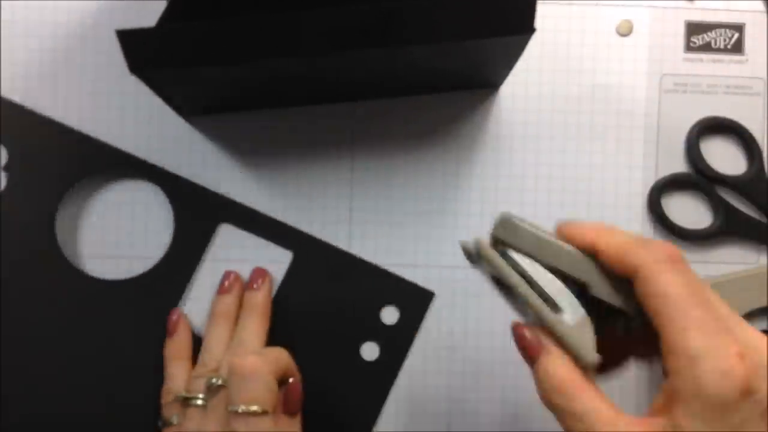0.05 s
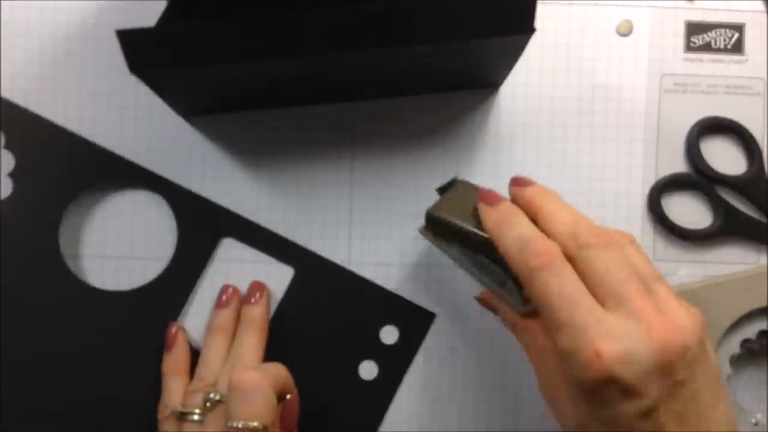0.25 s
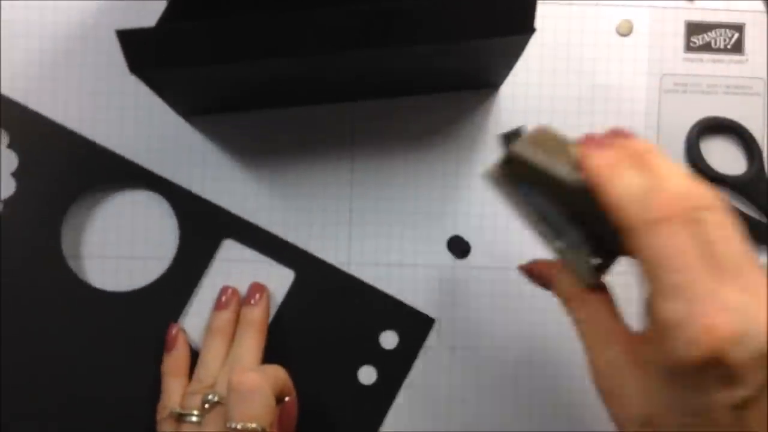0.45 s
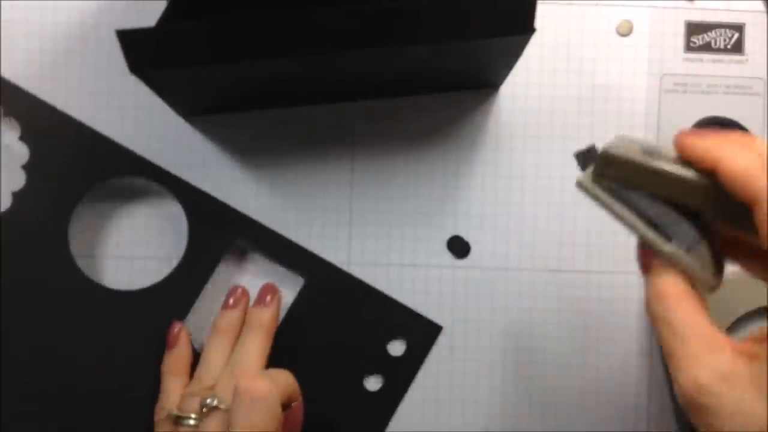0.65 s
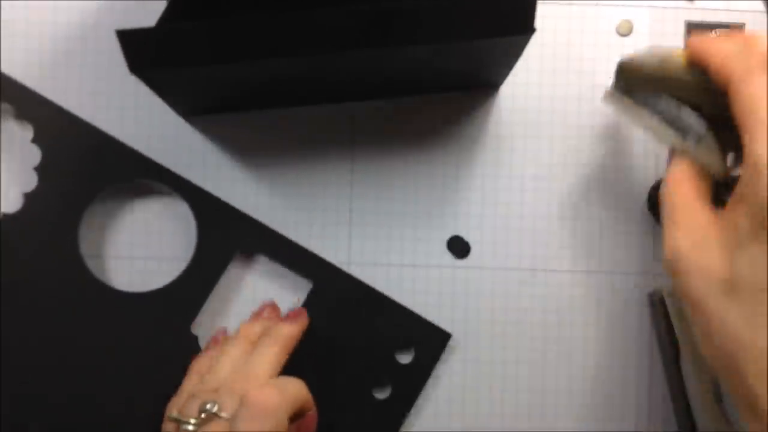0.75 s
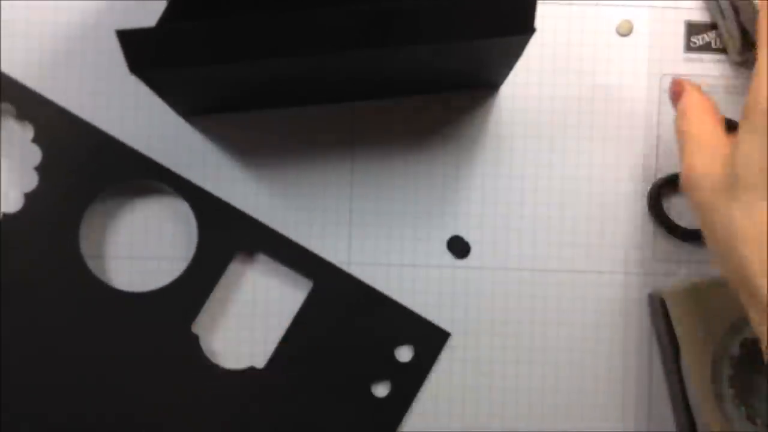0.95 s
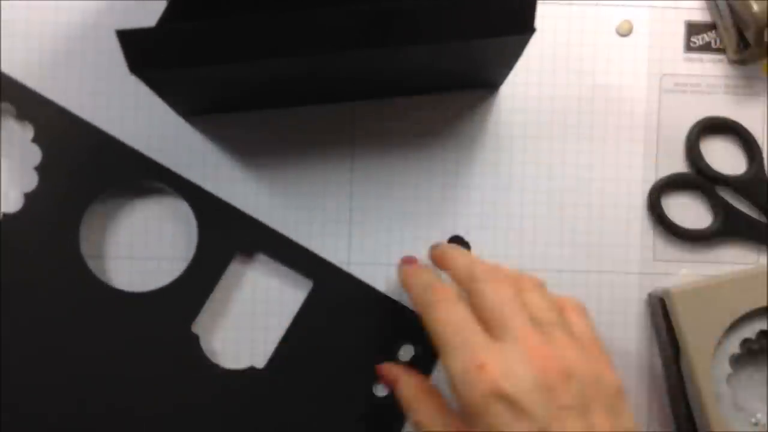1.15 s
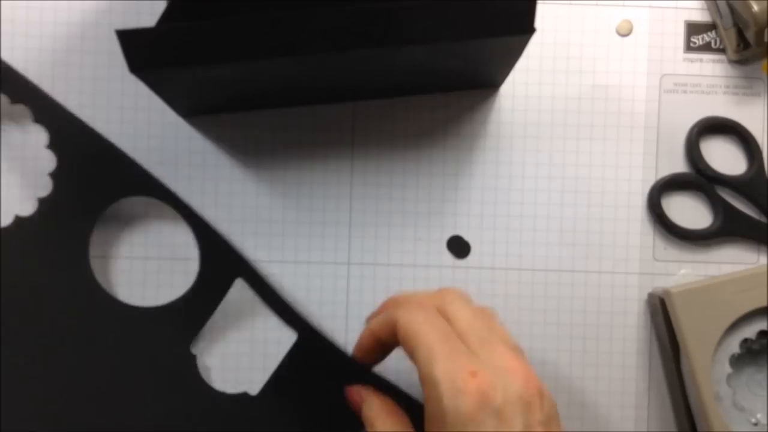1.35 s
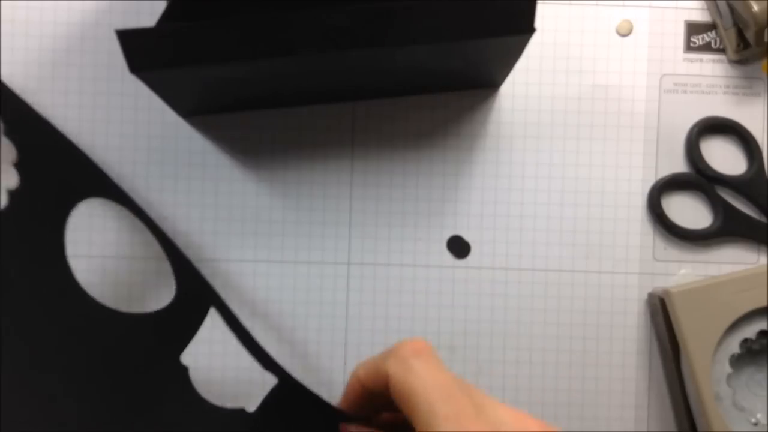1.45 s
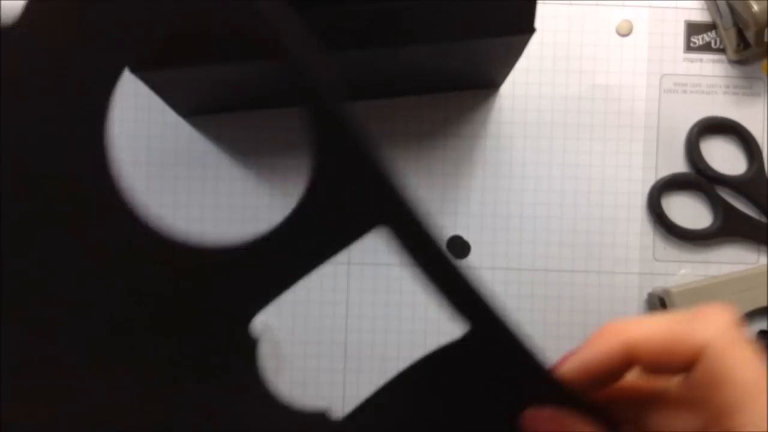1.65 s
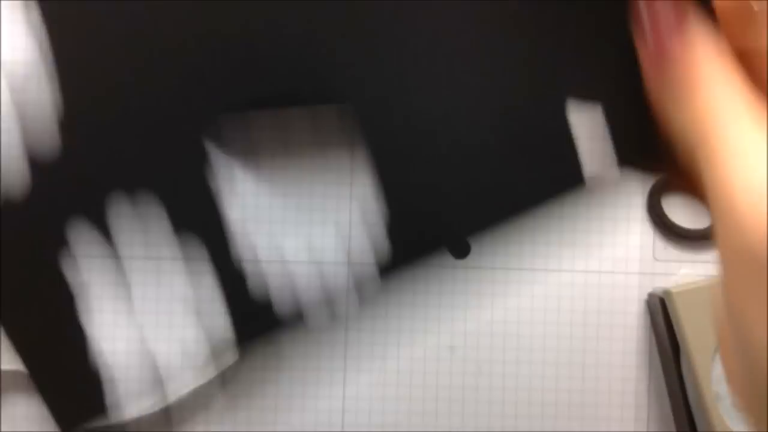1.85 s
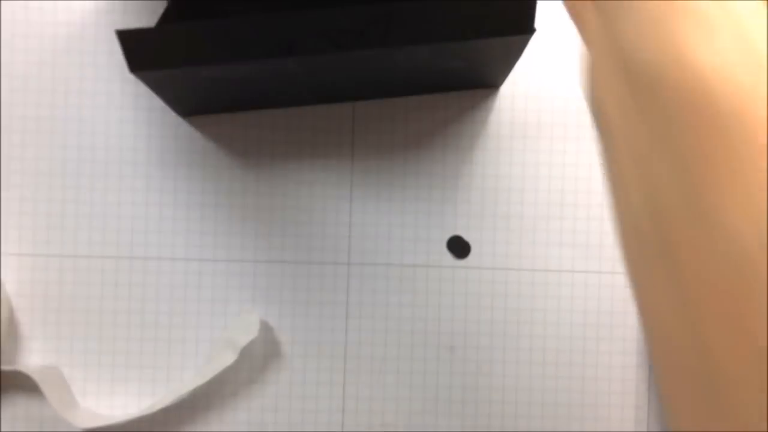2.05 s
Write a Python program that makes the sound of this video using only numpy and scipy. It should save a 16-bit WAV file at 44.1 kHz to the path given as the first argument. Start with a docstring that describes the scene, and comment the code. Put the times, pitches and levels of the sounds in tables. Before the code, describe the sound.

A small metal paper punch is handled close by in a quiet room. It scrapes off cardstock at the start, then taps the table twice, rattling, around 0.3 and 0.45 seconds. Soft skin rubs and card flicks follow. Just after 1 second comes the loudest sound, a sharp three-part metallic clack with a table thump. From 1.3 to 1.9 seconds the card slides, hissing, and crackles as it lifts.

```python
"""A small metal paper punch at a craft table, close by in a small room with faint steady air.
First it scrapes off a sheet of cardstock and is tapped twice on the table, its loose parts rattling.
It shifts in the hand with a rub of skin and a few flicks of card, then is put down with a sharp
three-part clack that rings its body and thumps the table. Last, fingers drag the card hissing over
the work surface and lift it, and it crackles as it bends."""
import sys
import numpy as np
from scipy import signal
from scipy.fft import rfft, irfft, next_fast_len
from scipy.io import wavfile

SR = 44100
rng = np.random.default_rng(int(sys.argv[2]) if len(sys.argv) > 2 else 0)


def pcm_store(signal):
    """Save signal as 16-bit PCM."""
    levels = np.round(np.clip(np.atleast_2d(signal), -1, 1) * 32767)
    wavfile.write(sys.argv[1], SR, levels.astype(np.int16).T)


N = 91860


def amp(db):
    """Decibels to gain."""
    return 10 ** (np.asarray(db) / 20)


def unit_rms(x):
    """Scale to rms 1."""
    return x / np.sqrt(np.mean(x ** 2) + 1e-20)


def along(points, hz):
    """Read a curve of (frequency, value) points on a log frequency axis."""
    freqs, values = np.transpose(points)
    return np.interp(np.log(hz + 1), np.log(freqs + 1), values)


def fader_curves(rows):
    """A dB envelope for each column after the time, silent outside the rows."""
    times, *columns = np.transpose(rows)
    return [np.interp(np.arange(N) / SR, times, db, right=-120) for db in columns]


def filtered(x, response):
    """EQ x with a gain given as response(hz)."""
    size = next_fast_len(len(x) + SR // 8)
    return irfft(rfft(x, size) * response(np.fft.rfftfreq(size, 1 / SR)), size)[:len(x)]


def noise(level_db, size=N):
    """Noise of rms 1, coloured by level_db(hz)."""
    return unit_rms(filtered(rng.standard_normal(size), lambda hz: amp(level_db(hz))))


def decay(t60):
    """A quarter second of fade that falls 60 dB in t60 seconds."""
    return np.exp(-np.log(1000) * np.arange(SR // 4) / SR / t60)


def burst(level_db, t60):
    """A dying puff of coloured noise."""
    return noise(level_db, size=SR // 4) * decay(t60)


def ring(modes, rise_s, mode_ratio):
    """Struck, damped modes; mode k is scaled by mode_ratio ** k, so a negative ratio alternates phase."""
    t = np.arange(SR // 4) / SR
    waves = [mode_ratio ** k * amp(db) * decay(t60) * np.sin(2 * np.pi * hz * t)
             for k, (hz, db, t60) in enumerate(modes)]
    return sum(waves) * (1 - np.exp(-t / rise_s))


def add(track, start_s, sound):
    """Mix a sound into the track at its cue."""
    part = track[round(start_s * SR):][:len(sound)]
    part += sound[:len(part)]


def rub(spectrum, grain_hz=674, grain_db=2):
    """Friction hiss, roughened by fibres that catch and let go."""
    grain = np.interp(np.arange(N) * grain_hz / SR, np.arange(N), rng.standard_normal(N))
    return unit_rms(noise(lambda hz: along(spectrum, hz)) * amp(grain_db * grain))


# colour of the room's air: f/Hz, level/dB
AIR_SPECTRUM = [(25, -44.5), (85, -23.5), (125, -8), (180, -3), (260, -13.5), (400, -16.5), (600, -14),
                (900, -21), (1150, -22), (1380, -13), (1800, -22), (5000, -29.5), (14800, -30),
                (16000, -53)]

def room_tone(murmur_hz=157.5, width_hz=10):
    """A faint bed of steady air with a low murmur."""
    murmur = noise(lambda hz: -20 * np.log10(1 + ((hz - murmur_hz) / width_hz) ** 2))
    air = noise(lambda hz: along(AIR_SPECTRUM, hz))
    return amp(-68.5) * air + amp(-74) * murmur


# envelope of the card sliding out: t/s, level/dB
PULL_ENVELOPE = [(0, -40), (.025, -37), (.055, -48), (.11, -41), (.135, -46), (.16, -40), (.2, -47.5),
                 (.22, -43.5), (.25, -56), (.31, -62.5), (.335, -56.5), (.36, -51), (.39, -58), (.42, -73),
                 (.45, -74)]
# colour of its scrape: f/Hz, level/dB
PULL_SPECTRUM = [(120, -72), (200, -48), (294, -18), (334, -28.5), (735, -13.5), (851, -17.5), (1100, -11),
                 (1910, -2), (4350, -7), (6520, -6), (13800, -12.5), (15100, -21), (16000, -39)]

def card_pull():
    """The card scrapes out of the punch's slot."""
    level_db, = fader_curves(PULL_ENVELOPE)
    return amp(level_db) * rub(PULL_SPECTRUM)


# hits within two light taps that shake the punched disc out: t/s, rattle/dB, tick/dB, thud/dB
TAP_HITS = [(.3086, -57, -36, -80), (0.3148, -44, -33.5, -27), (0.3166, -41, -39, -40),
            (0.318, -21.5, -26, -52), (0.3207, -48, -27.5, -36.5), (0.4539, -61, -41, -72),
            (.4580, -38, -25.5, -26), (.4605, -44, -30, -39)]
# modes of the punch's loose parts: f/Hz, level/dB, t60/s
LOOSE_PART_MODES = [(2950, -1, 0.014), (4263, -2, 0.018), (7030, -35, 0.054), (7730, -15, 0.023),
                    (9530, 5, 0.02), (10800, -13, 0.017), (13500, -11, 0.021)]
# colour of a tap's attack: f/Hz, level/dB
TICK_SPECTRUM = [(200, -5), (900, -8), (2000, -3), (4000, -4.5), (6000, -5.5), (9500, 6), (12000, -6.5),
                 (14000, -3), (16000, -35)]
# modes of the table top, the low end of both taps and clacks: f/Hz, level/dB, t60/s
TABLE_MODES = [(138, -12, 0.04), (189, -6, 0.059), (243, 1, .05), (320, -2, .04), (410, -2, .032),
               (510, -6, .03), (630, -18, 0.024)]

def punch_taps():
    """Held in the hand the punch only ticks and rattles, over a soft thud of the table."""
    rattle, ticks, thuds = np.zeros((3, N))
    for start_s, rattle_db, tick_db, thud_db in TAP_HITS:
        add(rattle, start_s, amp(rattle_db) * ring(LOOSE_PART_MODES, rise_s=0.00045, mode_ratio=-0.96))
        add(ticks, start_s, amp(tick_db) * burst(lambda hz: along(TICK_SPECTRUM, hz), t60=0.01))
        add(thuds, start_s, amp(thud_db) * ring(TABLE_MODES, rise_s=0.00042, mode_ratio=0.96) / 2)
    return in_room(rattle, wet_db=-8) + in_room(ticks, wet_db=0) + in_room(thuds, wet_db=0.3)


# envelope of the punch shifting in the hand and fingers leaving the card: t/s, level/dB
GRIP_ENVELOPE = [(.56, -91), (.582, -57.5), (.604, -72), (.612, -46), (.62, -45.5), (.64, -51),
                 (.69, -72.5), (.717, -50.5), (.721, -39.5), (.74, -39), (.772, -51.5), (.808, -46.5),
                 (.826, -50), (.85, -67), (.88, -67.5), (.903, -52), (.92, -66), (.95, -55), (.98, -82.5)]
# colour of rubbing skin: f/Hz, level/dB
GRIP_SPECTRUM = [(120, -46.5), (400, -27), (700, -16), (1050, -10.5), (1600, -10), (2300, -4.5),
                 (2850, 3.5), (3600, -8.5), (6000, -8.5), (11000, -9.5), (14500, -29.5), (16000, -35)]

def hand_rub(dull_below_db=-53.5, lowpass_hz=3400):
    """Skin rubs on punch and card, brighter when it presses harder."""
    level_db, = fader_curves(GRIP_ENVELOPE)
    hiss = rub(GRIP_SPECTRUM)
    dull = filtered(hiss, lambda hz: 1 / np.sqrt(1 + (hz / lowpass_hz) ** 4))
    brightness = 1 / (1 + amp(dull_below_db - level_db))
    return amp(level_db) * (brightness * hiss + (1 - brightness) * dull)


# snaps and crackles of the card: t/s, level/dB, t60/s, centre f/Hz
CARD_SNAPS = [(0.5806, -51.5, 0.026, 2040), (0.622, -58, 0.01, 3540), (0.7188, -39, 0.01, 3520),
              (0.7268, -32.5, 0.023, 5150), (0.8132, -30.5, .014, 1350), (0.9432, -47.5, 0.0068, 2960),
              (1.1575, -37, 0.006, 6150), (1.308, -47.5, 0.026, 440), (1.3155, -49, .008, 9040),
              (1.3477, -32.5, .012, 3990), (1.361, -39, 0.012, 2480), (1.3974, -31.5, .008, 1980),
              (1.4005, -36.5, 0.039, 1510), (1.4168, -36.5, 0.027, 1300), (1.4395, -38, 0.022, 580),
              (1.442, -34, 0.037, 2410), (1.458, -41, 0.035, 2030), (1.509, -40.5, .008, 3980),
              (1.524, -49.5, 0.055, 1740), (1.658, -43, .006, 2500), (1.6976, -39, 0.02, 1100),
              (1.7308, -38.5, 0.028, 880), (1.826, -68, .015, 3500), (1.884, -44.5, .025, 900),
              (1.915, -57, .012, 3516)]

def card_flicks():
    """Short, ringless snaps as the card is touched and bends."""
    snaps = np.zeros(N)
    for start_s, level_db, t60, centre_hz in CARD_SNAPS:
        def band_db(hz):
            octaves = np.abs(np.log2((hz + 1) / centre_hz))
            rolloff_db = np.where(hz < centre_hz, 9.5, 4)  # one octave under, one octave over
            return -rolloff_db * octaves ** 1.5
        add(snaps, start_s, amp(level_db) * burst(band_db, t60))
    return snaps


# hits as the punch lands, and a quick echo of the loudest:
# t/s, ring/dB, crack/dB, crack t60/s, crack tilt/(dB per octave), thud/dB
CLACK_CUES = [(1.0085, -56.5, -43, 0.024, 0.5, -60), (1.0128, -25, -17, 0.021, 1, -12.5),
              (1.0163, -17, -14, .022, 1, -30), (1.0381, -7.5, -8, 0.032, -0.5, -32),
              (1.0472, -20, -22.5, .02, -1.5, -35.5), (1.0647, -39, -24.5, 0.028, -1, -50),
              (1.0699, -11.5, -8, .012, 0, -27), (1.074, -19, -22.5, 0.037, -1, -43),
              (1.1115, -34, -57, 0.024, 3, -56)]
# modes of the punch's metal body: f/Hz, level/dB, t60/s
BODY_MODES = [(1608, -18.5, .04), (2448, -24, .08), (2510, -14, 0.033), (2707, -7.5, .075),
              (2836, -2.5, 0.041), (2940, -20, .11), (2910, -23.5, 0.17), (3860, -17, 0.045),
              (4040, -13, 0.074), (4330, -20.5, 0.032), (6770, -16, 0.023), (7130, -6.5, 0.017),
              (10540, -10, .03), (11050, -12.5, .03)]
# colour of a clack's attack: f/Hz, level/dB
CRACK_SPECTRUM = [(100, -31), (350, -5.5), (1300, -0.5), (1900, -15), (2700, 12), (3400, 3), (4100, 9.5),
                  (5600, -3.5), (6400, -0.5), (7100, 4), (8000, 3), (10700, 2.5), (12000, -2),
                  (14500, -6.5), (16000, -28.5)]

def punch_clacks():
    """The punch clacks down: each cue layers a crack, the ring of the metal body and a table thump."""
    metal, cracks, thuds = np.zeros((3, N))
    for start_s, ring_db, crack_db, t60, tilt, thud_db in CLACK_CUES:
        crack = burst(lambda hz: along(CRACK_SPECTRUM, hz) + tilt * np.log2((hz + 1) / SR), t60)
        add(cracks, start_s, amp(crack_db) * crack)
        add(metal, start_s, amp(ring_db) * ring(BODY_MODES, rise_s=0.00045, mode_ratio=-1.013))
        add(thuds, start_s, amp(thud_db) * ring(TABLE_MODES, rise_s=0.00042, mode_ratio=0.83) / 2)
    return in_room(metal, wet_db=-9.5) + in_room(cracks, wet_db=2.9) + in_room(thuds, wet_db=1)


# envelopes of the card dragged and lifted: t/s, edge level/dB, sheet level/dB
DRAG_ENVELOPES = [(1.28, -90.5, -80.5), (1.324, -82, -72), (1.344, -46, -48), (1.384, -48.5, -58.5),
                  (1.41, -53.5, -58), (1.432, -48.5, -55), (1.444, -45.5, -45.5), (1.466, -45, -59),
                  (1.482, -67, -60), (1.525, -55, -72), (1.545, -58, -57.5), (1.578, -43, -73),
                  (1.604, -48.5, -63.5), (1.644, -57.5, -65), (1.692, -55.5, -61), (1.735, -52.5, -58.5),
                  (1.765, -68, -94), (1.79, -83, -93.5), (1.818, -96, -97), (1.828, -66.5, -55.5),
                  (1.862, -62.5, -58.5), (1.886, -60, -51), (1.9, -90, -90.5), (1.95, -90, -99)]
# bright hiss of the edge: f/Hz, level/dB
EDGE_SPECTRUM = [(1000, -26.5), (2500, -4), (4500, 1), (8000, 0), (11000, -2), (14500, -10), (16000, -26.5)]
# darker rustle of the sheet: f/Hz, level/dB
SHEET_SPECTRUM = [(100, -36), (250, -5), (600, -13), (1100, -1.5), (2000, -3.5), (3300, -7.5), (5000, -6),
                  (9000, -33.5)]

def card_drag():
    """The edge hisses over the table while the sheet itself rustles lower down."""
    edge_db, sheet_db = fader_curves(DRAG_ENVELOPES)
    return amp(edge_db) * rub(EDGE_SPECTRUM) + amp(sheet_db) * rub(SHEET_SPECTRUM)


# early reflections off nearby surfaces: delay t/s, level/dB
REFLECTIONS = [(.0013, -24.5), (.0031, -18.5), (.0086, -16)]
# reverb decay time: f/Hz, t60/s
REVERB_T60 = [(150, 0.33), (400, 0.28), (1000, 0.26), (3000, 0.24), (8000, .22), (15000, .17)]
# EQ of the reverb send: f/Hz, level/dB
REVERB_SEND = [(100, -24), (180, -9.5), (330, 2), (1000, -10), (3000, -12.5), (8000, -19.5), (15000, -15.5)]

def in_room(x, wet_db, rise_s=0.0047):
    """The sound, its first echoes and a short diffuse tail in which the bass lasts longest."""
    hz, t, noise_bands = signal.stft(rng.standard_normal(SR // 2), SR, nperseg=256)
    fade = np.exp(-np.log(1000) * t / along(REVERB_T60, hz)[:, None]) * (1 - np.exp(-t / rise_s))
    band_energy = np.mean(fade ** 2, axis=1, keepdims=True) * SR / 2
    send = amp(wet_db + along(REVERB_SEND, hz))[:, None] / np.sqrt(band_energy)
    _, tail = signal.istft(noise_bands * fade * send, SR, nperseg=256)
    near = filtered(x, lambda f: 1 + sum(amp(db) * np.exp(-2j * np.pi * f * s) for s, db in REFLECTIONS))
    return near + signal.fftconvolve(x, tail)[:N]


def scene():
    """Punch and card over the room tone, mixed to mono."""
    card = card_pull() + hand_rub() + card_flicks() + card_drag()
    return (room_tone() + in_room(card, wet_db=-1.5) + punch_taps() + punch_clacks())[None]


def record(dry):
    """The microphone sheds the deep bass, clips at full scale and keeps nothing above its band limit."""
    low_cut_hz, high_cut_hz, limit_hz = 131, 15110, 16600
    low_cut = signal.butter(N=6, Wn=low_cut_hz, btype="high", fs=SR, output="sos")
    clipped = np.clip(signal.sosfilt(low_cut, dry[0]), -1, 1)
    return filtered(clipped, lambda hz: (hz < limit_hz) / np.sqrt(1 + (hz / high_cut_hz) ** 90))[None]


dry = scene()
out = record(dry)
pcm_store(out)
```